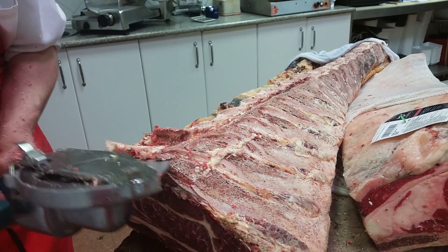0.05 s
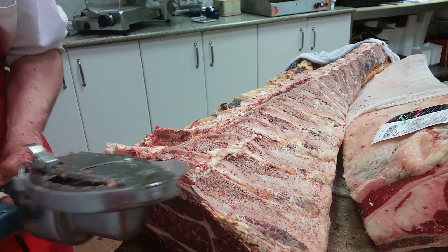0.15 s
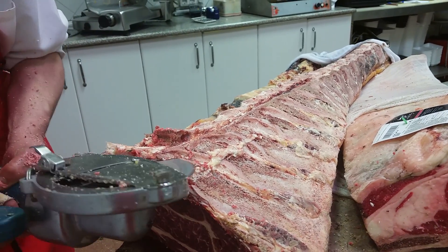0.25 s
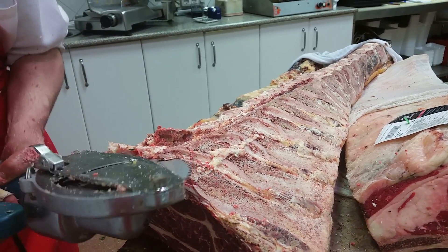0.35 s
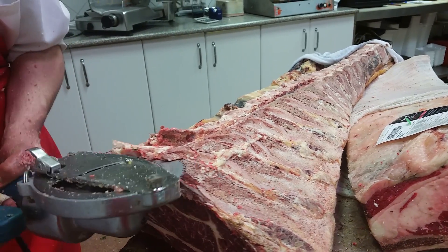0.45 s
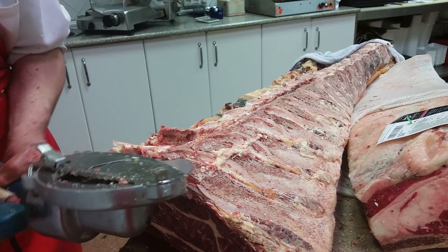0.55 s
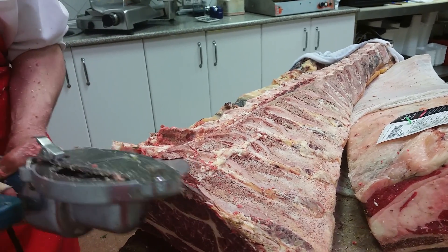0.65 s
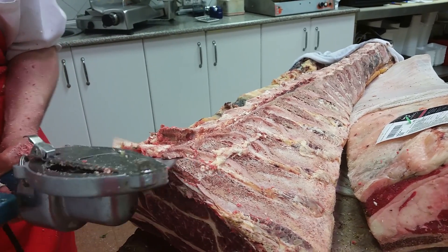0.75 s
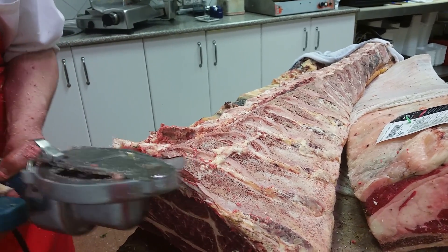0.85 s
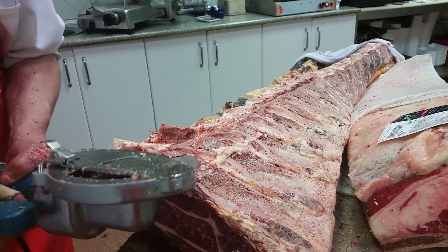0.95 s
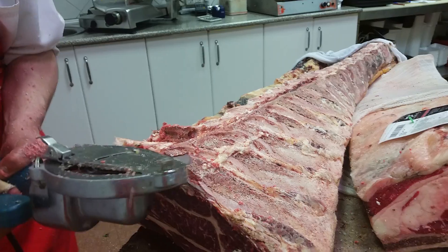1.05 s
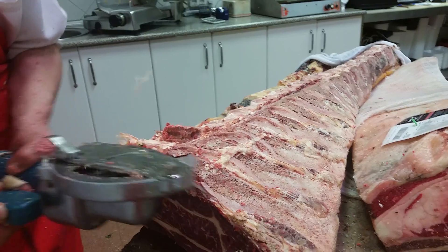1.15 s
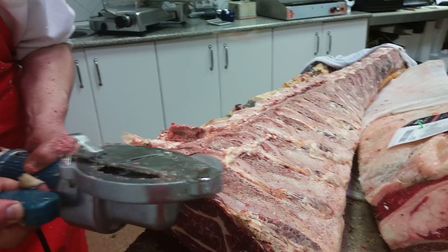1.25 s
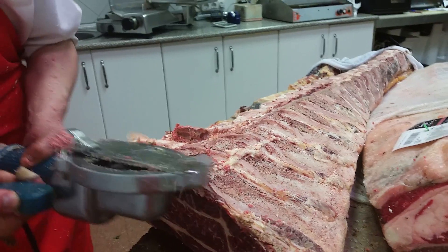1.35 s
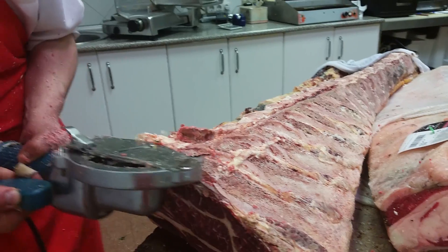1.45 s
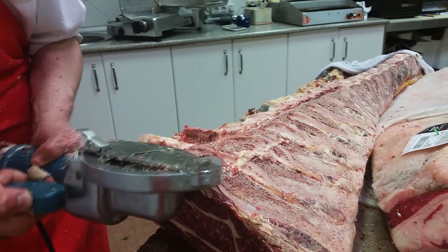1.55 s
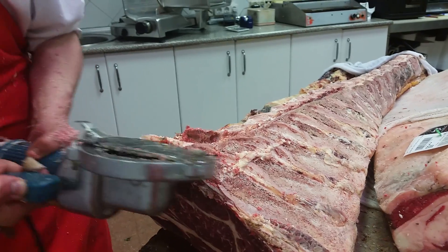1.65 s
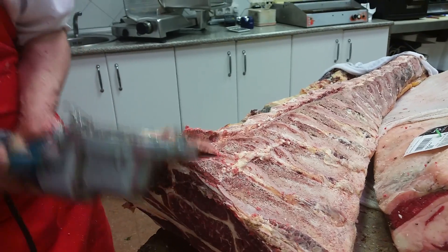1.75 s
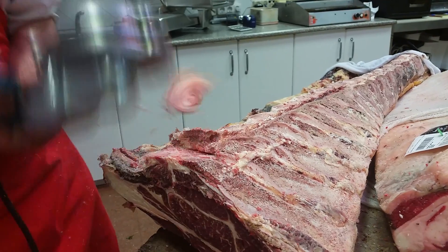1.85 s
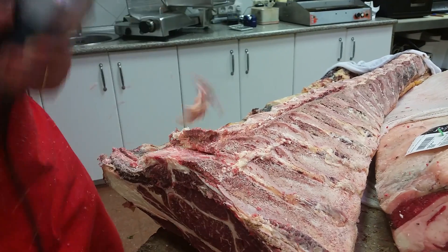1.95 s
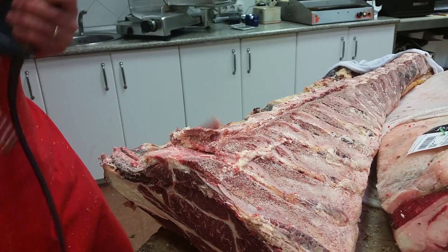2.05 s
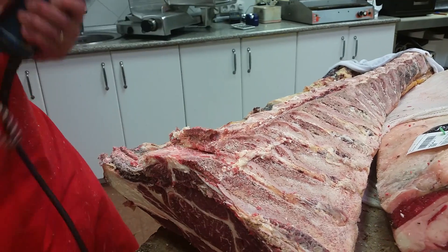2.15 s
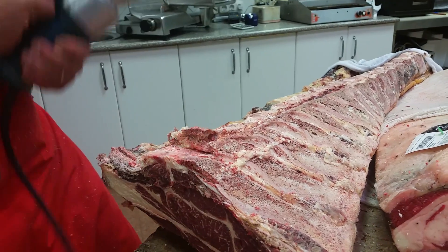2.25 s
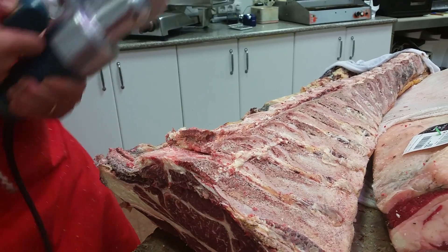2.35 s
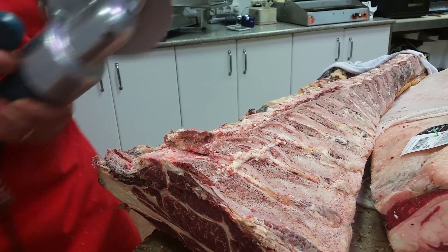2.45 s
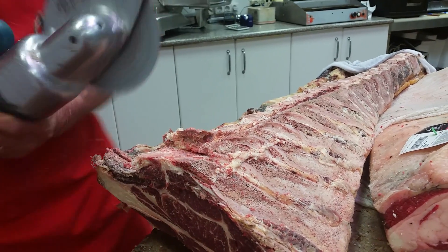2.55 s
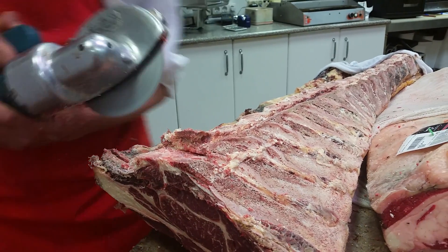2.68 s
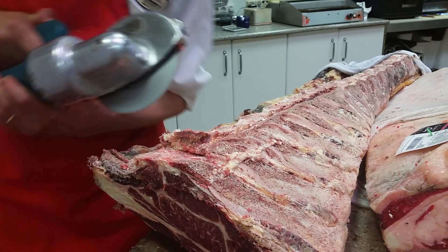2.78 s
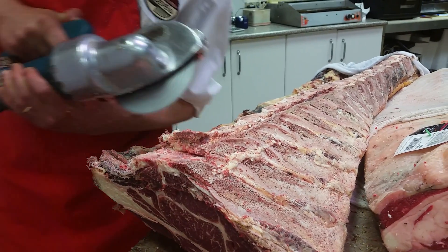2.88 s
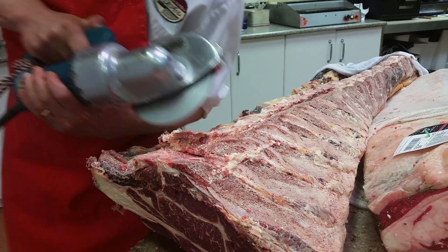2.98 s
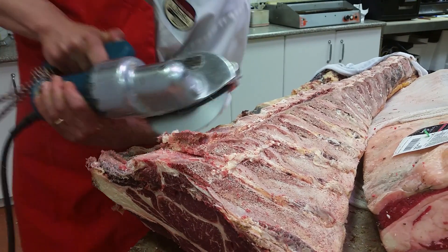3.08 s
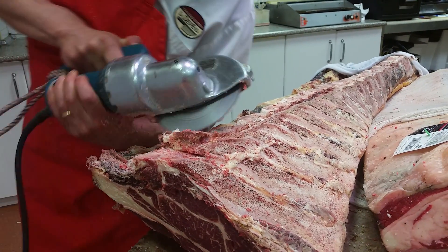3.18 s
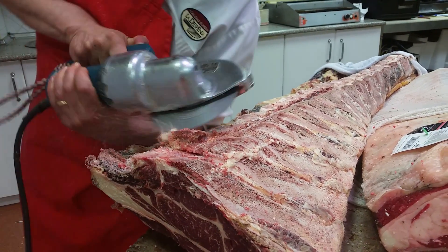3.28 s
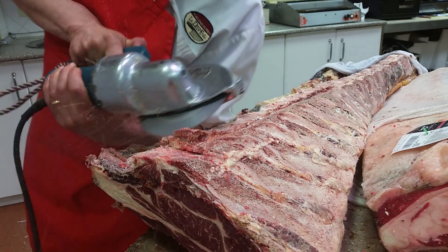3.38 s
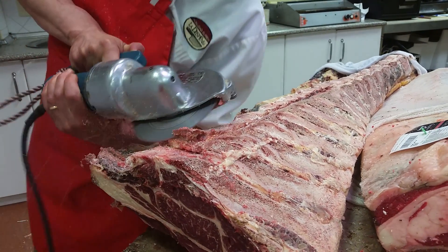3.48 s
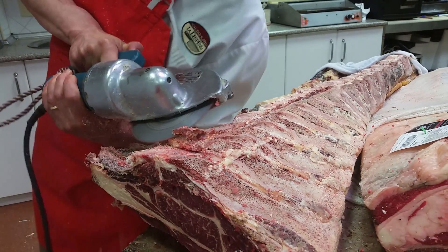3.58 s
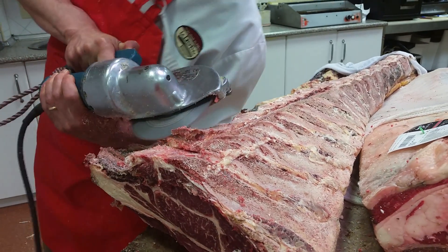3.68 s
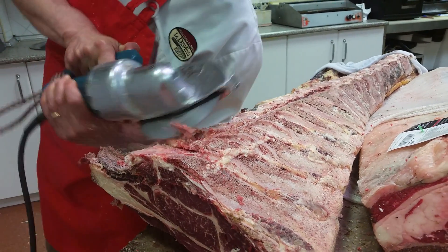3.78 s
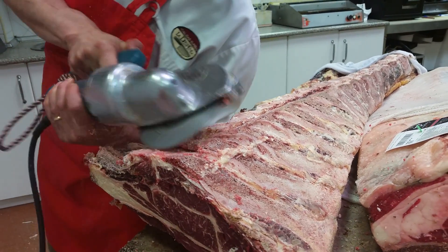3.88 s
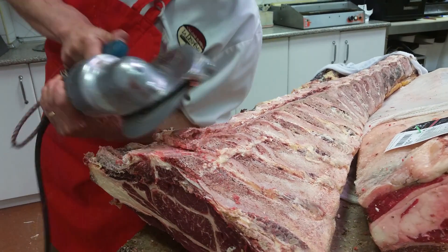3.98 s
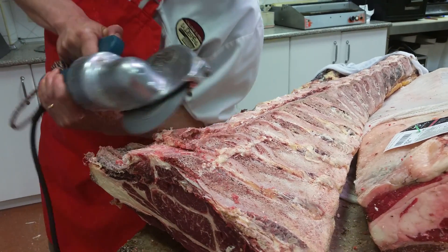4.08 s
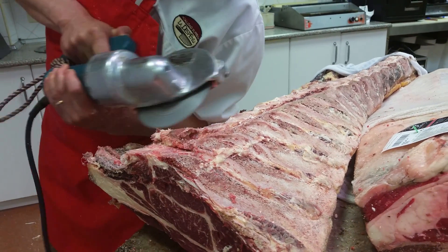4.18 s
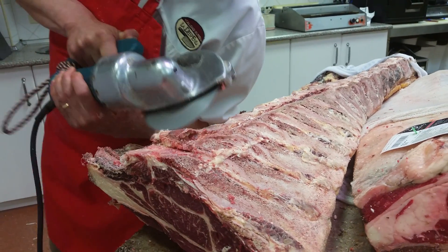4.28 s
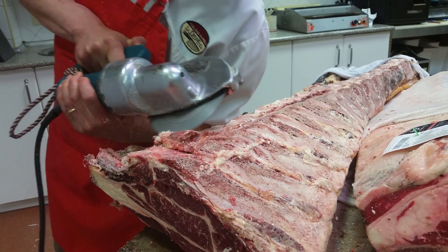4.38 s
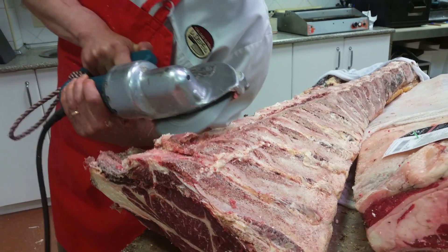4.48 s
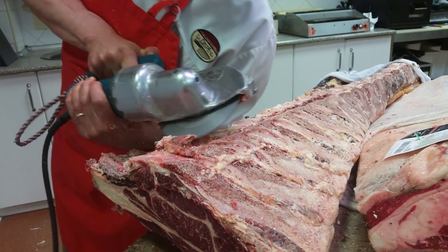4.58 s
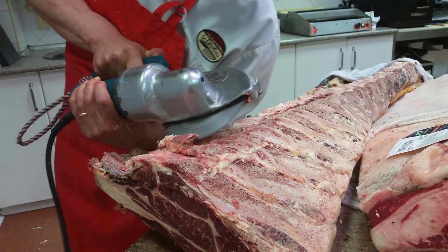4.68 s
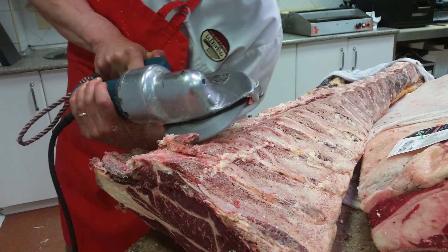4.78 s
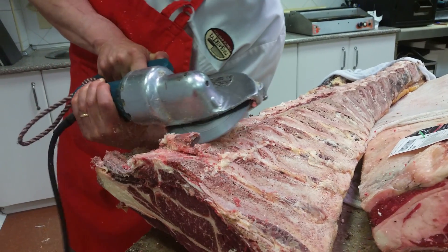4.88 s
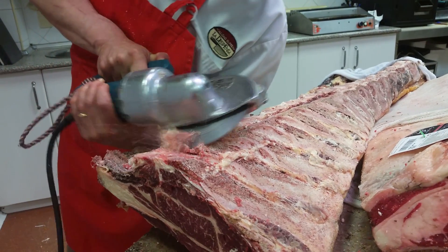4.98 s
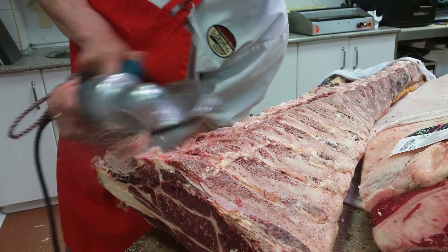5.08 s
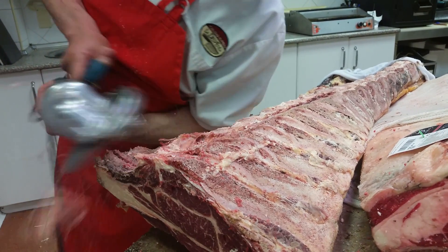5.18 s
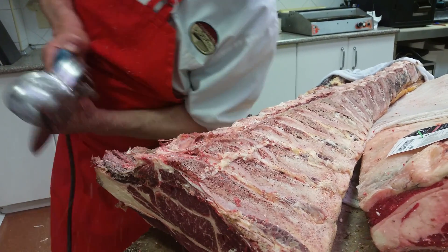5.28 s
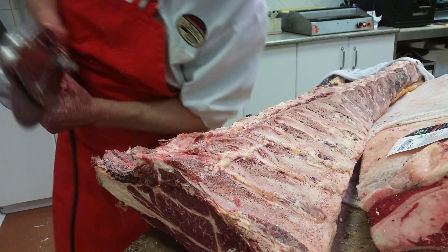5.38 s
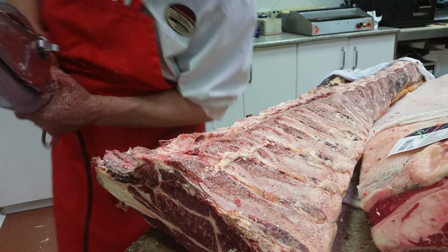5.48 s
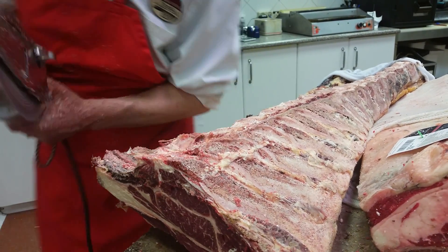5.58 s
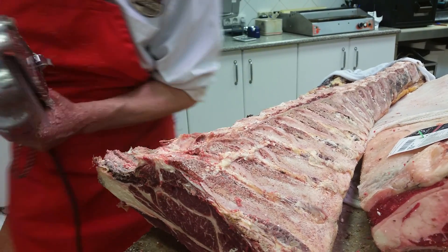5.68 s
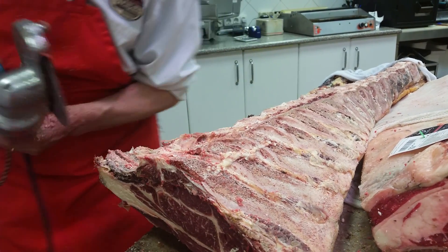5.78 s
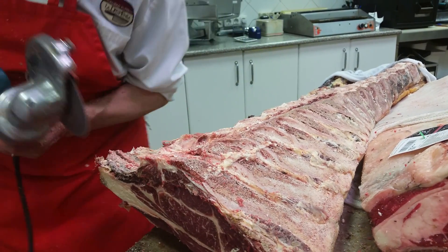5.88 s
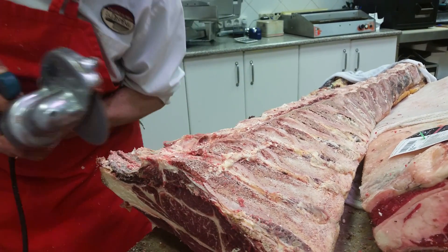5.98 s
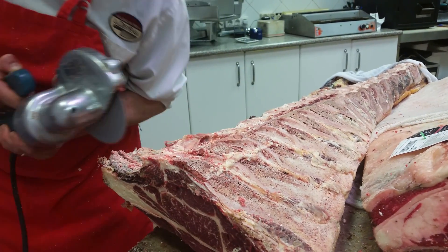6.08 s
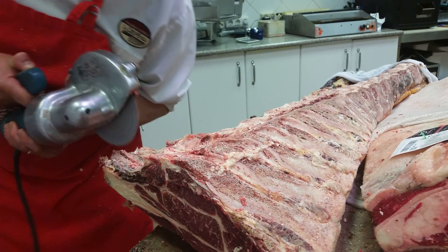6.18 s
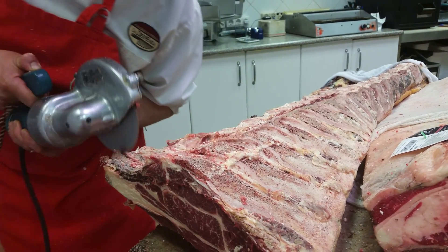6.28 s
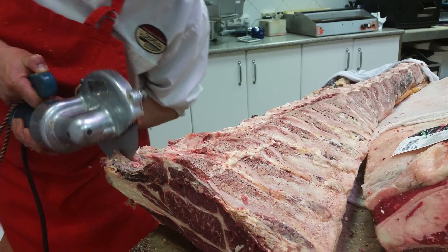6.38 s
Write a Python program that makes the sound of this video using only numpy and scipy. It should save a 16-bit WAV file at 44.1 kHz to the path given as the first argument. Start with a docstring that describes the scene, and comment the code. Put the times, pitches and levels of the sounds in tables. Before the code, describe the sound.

A handheld circular saw rasps into beef bone, jams for a moment, then breaks free into a longer cut with a ringing blade and dull knocks of flying chips. The motor coasts down with rattling gears, whines back up and makes several more cuts before dipping and climbing again. The saw is close and somewhat to the right, in a small tiled room with a faint refrigeration hum.

```python
"""Circular saw on beef rib

A handheld saw cuts bone in a small tiled room, over low rumble and refrigeration hum.
The teeth rasp, tear out chips and set the steel disc ringing; the blade jams once and breaks free.
The trigger is released and pulled again: gears rattle, the motor whine sinks and climbs."""
import sys
import numpy as np
from scipy import signal
from scipy.io import wavfile
from scipy.ndimage import uniform_filter1d

SR = 44100
rng = np.random.default_rng(int(sys.argv[2]) if len(sys.argv) > 2 else 0)


def store_wav(level_fs):
    """Save 16-bit WAV to argv[1]."""
    pcm = np.round(np.clip(np.atleast_2d(level_fs), -1, 1) * 32767)
    wavfile.write(sys.argv[1], SR, pcm.T.astype(np.int16))


N = 283563
TIME_S = np.arange(N) / SR

# Table levels are relative within each layer.
# room rumble: freq_hz, density_db
RUMBLE_SPECTRUM = [(20, -10), (45, 6), (80, -25), (200, 1), (500, -2), (2000, -5), (10000, -18)]
# refrigeration hum: pitch_hz, level_db
HUM_TONES = [(101, -57.5), (325, -62.5)]
# trigger held: pulled_s, released_s
TRIGGER_SPANS = [(0, .28), (.62, 1.764), (2.485, 5.11), (5.56, 6.28)]
# how the saw is held: time_s, left_minus_right_db, nearness_db, vent_facing_db
SAW_POSES = [(0.0, -3.5, 2, 2), (0.59, -8.5, 2.5, 0), (0.64, -11, 2, 2.5), (1.84, -6, 0.5, 2),
             (2.22, -8.5, 0, 0.5), (3.49, -7, 0, -3), (4.32, -7.0, 0, 0.5), (4.51, -10, -0.5, -11),
             (5.17, -9.5, 1, 1), (5.23, -7.5, 0.5, 2), (5.77, -10, 0, -2), (6.43, -1, 1, 1.5)]
# fan, bearing and commutator tones: rotor_multiple, level_db
ROTOR_ORDERS = [(1, -31), (1.5, -33.5), (2, -28.5), (2.585, -39), (3, -30.5), (3.63, -29), (9.56, -40),
                (16, -9.5), (32, -19.5)]
# gearbox rattle: freq_hz, density_db
GEAR_SPECTRUM = [(100, -22), (400, -19), (950, -12), (1400, -6), (2000, -4.5), (2700, -3.5), (3550, -13.5),
                 (4500, 3), (6200, -1), (7300, -1.5), (8900, -1), (9800, -22.5), (15500, -25)]
# gear case resonances: freq_hz, width_hz, gain_db
CASE_MODES = [(1930, 160, 3.5), (2454, 220, 10), (6150, 306, 10.5), (9000, 1140, 3)]
# cooling air: freq_hz, density_db
FAN_SPECTRUM = [(200, -19), (900, -25), (1800, -10.5), (2600, 4), (3600, -3), (4600, 0), (6400, 4.5),
                (9000, 5.5), (10000, 1.5), (15500, -7)]
# housing under strain: start_s, end_s, level_db
HOUSING_GROANS = [(0.31, 0.38, -39), (0.607, 0.714, -36.5)]
# blade in bone: start_s, end_s, bite_db, fade_db_per_s, wobble_db, rotor_drag_per_s
BONE_CUTS = [(-.01, 0.197, -21.3, 52, 0, 0.53), (.638, 1.74, -21.5, 75, 2, 0.51),
             (1.835, 1.909, -22, 230, -1, 0.52), (3.35, 3.598, -22.5, 53, 3, .38),
             (3.844, 3.909, -19.5, 600, 1, 0.98), (4.413, 5.101, -19.5, 304, 1, .45)]
# brief touches on bone: start_s, level_db, length_s
BONE_GRAZES = [(0.638, -25, 0.013), (3.172, -21, 0.023), (3.207, -24, 0.019), (3.236, -19, 0.034),
               (3.308, -16.5, 0.03), (3.983, -14.5, 0.01), (5.17, -17, 0.035), (6.352, -19, 0.028)]
# teeth digging deep: start_s, end_s, level_db
DEEP_DIGS = [(0, 0.23, -27.5), (0.719, 1.24, -29.5), (1.319, 1.449, -37), (1.44, 1.749, -29),
             (1.854, 1.912, -34), (3.427, 3.519, -29.5), (3.842, 3.884, -30), (4.424, 4.6, -28),
             (4.747, 4.935, -28), (4.995, 5.097, -29.5)]
# largest chips: time_s, level_db
LARGE_CHIPS = [(0.733, -13), (0.868, -3), (0.911, -4), (0.987, -9), (1.028, -7), (1.115, -3.5), (1.152, 2),
               (1.634, 0.5), (4.57, 1), (5.066, 2)]
# dull knock of a chip: freq_hz, density_db
CHIP_SPECTRUM = [(25, -15), (60, -4.5), (110, -1.5), (200, -2), (400, -5), (800, -9.5), (1600, -9),
                 (5000, -38)]
# teeth in bone: freq_hz, density_db
RASP_SPECTRUM = [(100, -33), (400, -4.5), (900, 0), (2000, -2.5), (4000, 5.5), (7000, -38), (10000, -8),
                 (15500, 6.5)]
# disc and guard modes: freq_hz, width_hz, flat_db, upright_db
BLADE_MODES = [(1850, 570, -8, -30), (2320, 130, -4.5, -10.5), (2408, 400, -15, -8),
               (2950, 210, -9.5, -8.5), (3720, 130, -14, -14.5), (4596, 73, -20, -10),
               (4826, 65, -5, -12.5), (5900, 42, -5.5, -6.5), (6220, 95, -1.5, -3), (6800, 320, -6, -5),
               (7445, 150, -4.5, -4.5), (7800, 170, -0.5, -5.5), (8250, 420, -2, -9.5), (8380, 130, -9, -9),
               (9440, 460, -3, -1), (10954, 100, -16, -3), (11290, 200, -0.5, -0.5),
               (13000, 240, -39, -1.5), (13500, 310, -6.5, -5.5)]
# disc brushing the cut, one row: start_s, end_s, level_db, fade_db_per_s
SING_SPAN = (3.48, 3.82, -20.5, 200)
# modes of the brushed disc: freq_hz, width_hz, level_db
SING_MODES = [(10890, 110, 0), (12910, 150, -3.5)]

INITIAL_HZ, FREE_HZ, GEAR_RATIO = 371, 473.2, 18.4  # rotor speeds; rotor turns per disc turn
JAM_S, FREED_S = .365, .603
UPRIGHT_S = 2.5  # saw held flat until then
BITE_ATTACK_S = .008


def gain_of(db):
    """Decibels to amplitude."""
    return np.exp(np.asarray(db) * (np.log(10) / 20))


def unit_rms(x):
    """Scale to rms 1."""
    return x / np.sqrt(np.mean(x ** 2) + 1e-20)


def during(start_s, end_s):
    """Rectangular gate."""
    return 1.0 * ((TIME_S >= start_s) & (TIME_S < end_s))


def stroke(start_s, end_s, attack_s, fade_db_per_s):
    """Linear attack, hold, steady fade in dB after end_s."""
    fade_db = np.minimum(fade_db_per_s * np.maximum(TIME_S - end_s, 0), 200)
    return np.clip((TIME_S - start_s) / attack_s, 0, 1) * gain_of(-fade_db)


def wander(rate_hz):
    """Random drift, unit rms."""
    knots = rng.standard_normal(2 ** 14)
    return unit_rms(np.interp(TIME_S * (2.5 * rate_hz), np.arange(len(knots)), knots))


def linger(x, decay_s):
    """One-pole lag with an exponential tail."""
    pole = np.exp(-1 / (decay_s * SR))
    return signal.lfilter([1 - pole], [1, -pole], x)


def diffuse(shared=.23, lag_samples=6):
    """Stereo noise: a direct share reaches the left first, the rest comes from every wall."""
    noise = rng.standard_normal((3, N), dtype=np.float32)
    direct = np.array([noise[2], np.roll(noise[2], lag_samples)])
    return np.sqrt(1 - shared) * noise[:2] + np.sqrt(shared) * direct


def strikes(per_s, spread_db, decay_s, shared=.3):
    """Random impacts of unequal size, each a short spray of reflections; unit rms."""
    sizes = gain_of(spread_db * np.minimum(rng.exponential(1, N), 4))
    hits = sizes * (rng.random(N) < per_s / SR)
    return unit_rms(np.sqrt(linger(hits ** 2, decay_s)) * diffuse(shared))


def colour(x, spectrum, peaks=(), size=4096):
    """Unit-energy minimum-phase filter from a spectrum and resonant peaks."""
    hz = abs(np.fft.fftfreq(size, 1 / SR))
    knots_hz, knots_db = np.transpose(spectrum)
    db = np.interp(np.log(hz + 1), np.log(knots_hz + 1), knots_db)
    for peak_hz, width_hz, gain_db in peaks:
        db += gain_db / (1 + (2 * (hz - peak_hz) / width_hz) ** 2)
    log_response = np.conj(signal.hilbert(np.log(gain_of(db))))
    impulse = np.fft.ifft(np.exp(log_response)).real[:size // 2]
    return signal.oaconvolve(x, impulse[None] / np.linalg.norm(impulse), axes=1)[:, :N]


def ring(x, hz, width_hz):
    """One mode; white noise keeps its level through it."""
    radius = np.exp(-np.pi * width_hz / SR)
    feedback = [1, -2 * radius * np.cos(2 * np.pi * hz / SR), radius ** 2]
    return signal.lfilter([1, 0, -1], feedback, x) * np.sqrt((1 - radius ** 2) / 2)


def panned(x, balance_db):
    """Raise left over right by balance_db."""
    return x * gain_of(np.array([[.5], [-.5]]) * balance_db)


def shaded(x, balance_db, shadow_hz=1000, lag_samples=10):
    """Source at one side: treble shaded at the far ear, bass equally loud at both."""
    bass = signal.sosfiltfilt(signal.butter(2, shadow_hz, fs=SR, output="sos"), x)
    return np.array([bass[0], np.roll(bass[0], lag_samples)]) + panned(x - bass, balance_db)


def room_tone(rumble_db=-53):
    """Refrigeration hum and low room rumble."""
    hum = sum(gain_of(db) * np.sqrt(2) * np.sin(2 * np.pi * (hz * TIME_S + rng.random()))
              for hz, db in HUM_TONES)
    return hum + gain_of(rumble_db) * colour(diffuse(shared=.85), RUMBLE_SPECTRUM)


def reflections(x, wall_db=-3, drift_hz=1.5, reach_s=.03, count=8):
    """Echoes off counter, cupboards and tiles drift as the saw moves, combing its sound."""
    out = x.copy()
    for ear in range(2):
        for delay_s in reach_s * rng.uniform(.1, 1, count):
            lag = 1 + int(delay_s * SR)
            echo = gain_of(wall_db) / np.sqrt(count) * wander(drift_hz) * x[ear]
            out[ear, lag:] += echo[:-lag]
    return out / np.sqrt(1 + gain_of(wall_db) ** 2)


def rotor_speed_hz(trigger, run_up_tau_s=.335, coast_tau_s=1.45, jam_drag_per_s=5):
    """Current pulls the rotor towards free speed; friction, bone and the jam brake it."""
    pull_per_s = trigger / run_up_tau_s
    friction_per_s = (1 - trigger) / coast_tau_s
    load_per_s = sum(drag * during(start_s, end_s) for start_s, end_s, *_, drag in BONE_CUTS)
    load_per_s += jam_drag_per_s * during(JAM_S, FREED_S)
    # solves speed' = pull * FREE_HZ - (pull + friction + load) * speed
    slowing = np.exp(np.cumsum(pull_per_s + friction_per_s + load_per_s) / SR)
    return (INITIAL_HZ + np.cumsum(FREE_HZ * pull_per_s * slowing) / SR) / slowing


def jam_gain(fade_db_per_s=88, breakaway_s=.024):
    """All that turns fades while the blade binds and snaps back as it breaks free."""
    stuck = np.clip(1 - (TIME_S - FREED_S) / breakaway_s, 0, 1)
    return gain_of(-fade_db_per_s * np.maximum(TIME_S - JAM_S, 0) * stuck)


def housing_groan(pitch_hz=615, width_hz=45):
    """The housing groans as the blade binds and again as the motor pulls it free."""
    strain = sum(gain_of(db) * stroke(start_s, end_s, attack_s=.025, fade_db_per_s=250)
                 for start_s, end_s, db in HOUSING_GROANS)
    return ring(strain * diffuse(), pitch_hz, width_hz)


def gear_clatter(flutter_db=1.5):
    """Gear teeth rattle in their resonant case."""
    impacts = strikes(per_s=1500, spread_db=2, decay_s=.002) * gain_of(flutter_db * wander(50))
    return colour(impacts, GEAR_SPECTRUM, CASE_MODES)


def gear_mesh(rotor_hz, multiple=15.8, spread_hz=330, onset_hz=295, full_hz_per_s=300):
    """Gear teeth rasp in a rising band while the rotor accelerates."""
    climb_hz_per_s = np.gradient(uniform_filter1d(rotor_hz, SR // 10)) * SR
    torque = np.clip(climb_hz_per_s / full_hz_per_s, 0, 1)
    fade_in = np.clip((rotor_hz - onset_hz) / 20, 0, 1)
    carrier = np.sin(2 * np.pi * np.cumsum(multiple * rotor_hz) / SR)
    return np.sqrt(2 * torque) * fade_in * carrier * np.array([wander(spread_hz), wander(spread_hz)])


def whine(rotor_hz, brush_gain, waver=.001, flicker_db=3, ear_lag_cycles=.1):
    """Rotor-locked tones; the high ones come from the commutator and follow the brushes."""
    turns = np.cumsum(rotor_hz * (1 + waver * wander(60))) / SR
    out = np.zeros((2, N))
    for multiple, db in ROTOR_ORDERS:
        drive = brush_gain if multiple > 5 else 1
        cycles = multiple * turns + rng.random()
        for ear in range(2):
            level = drive * gain_of(db + flicker_db * wander(12.5))
            out[ear] += level * np.sin(2 * np.pi * (cycles - ear * ear_lag_cycles))
    return np.sqrt(2) * out


def fan(vent_db):
    """Cooling air rushes, louder when the vents face the listener."""
    return gain_of(vent_db) * colour(diffuse(), FAN_SPECTRUM)


def motor(rotor_hz, trigger, bite, level_db=-18.5, gears_db=-2, mesh_db=-9, fan_db=-3,
          coast_db=.3, coast_drive_db=-3, flat_drive_db=4, smother_db=-28, reference_hz=450):
    """Gears, fan and whine follow rotor speed; load smothers the mesh and commutator tones."""
    _, nearness_db, vent_db = pose_db()
    pace = np.clip(rotor_hz / reference_hz, .3, 2)
    coasting = linger(1 - trigger, decay_s=.027)
    unloaded = 1 / (1 + (bite / gain_of(smother_db)) ** 2)
    powered_flat = (1 - coasting) * (TIME_S < UPRIGHT_S)
    drive = gain_of(coast_drive_db * coasting + flat_drive_db * powered_flat)
    clatter = gain_of(gears_db) * pace ** (1.15 * coasting) * gear_clatter()
    mesh = gain_of(mesh_db) * unloaded * gear_mesh(rotor_hz)
    air = gain_of(fan_db) * drive * pace ** 2.53 * fan(vent_db)
    tones = pace ** 2.6 * whine(rotor_hz, drive ** 2 * unloaded)
    return gain_of(level_db + coast_db * coasting + nearness_db) * (clatter + mesh + air + tones)


def pose_db():
    """The saw moves in the hand: balance, nearness and vent-facing curves."""
    times_s, *columns = np.transpose(SAW_POSES)
    return [np.interp(TIME_S, times_s, column) for column in columns]


def grazes():
    """Envelope of brief touches of blade on bone, each a steep-sided arch."""
    envelope = np.zeros(N)
    for start_s, db, length_s in BONE_GRAZES:
        progress = np.clip((TIME_S - start_s) / length_s, 0, 1)
        envelope += gain_of(db) * np.sqrt(abs(np.sin(np.pi * progress)))
    return envelope


def tooth_bite(rotor_hz, wobble, uneven_db=.5):
    """Contact strength: cuts that grow with speed and swing with disc wobble, plus grazes."""
    cutting = sum(stroke(start_s, end_s, BITE_ATTACK_S, fade_db_per_s) * gain_of(db + wobble_db * wobble)
                  for start_s, end_s, db, fade_db_per_s, wobble_db, _ in BONE_CUTS)
    return cutting * (rotor_hz / FREE_HZ) ** .22 * gain_of(uneven_db * wander(40)) + grazes()


def bone_chips(bite, wobble, small_db=2.5, large_db=7.5, graze_db=-16, crumbs_db=-24, wobble_db=4.2):
    """Chips tear loose with dull knocks: small ones spurting with each disc turn, a few large."""
    digging = sum(gain_of(db) * stroke(start_s, end_s, attack_s=.006, fade_db_per_s=360)
                  for start_s, end_s, db in DEEP_DIGS)
    spurts = gain_of(small_db + wobble_db * wobble) * digging
    tearing = spurts + gain_of(graze_db) * grazes() + gain_of(crumbs_db) * bite
    energy = np.zeros(N)
    for time_s, db in LARGE_CHIPS:
        energy[round(time_s * SR)] += gain_of(db + large_db) ** 2
    large = np.sqrt(linger(energy, decay_s=.0015)) * diffuse(shared=.096)
    small = tearing * strikes(per_s=380, spread_db=3, decay_s=.0024, shared=.069)
    return colour(small + large, CHIP_SPECTRUM)


def disc_sing(drift_db=3):
    """The disc sings high when it only brushes the cut."""
    start_s, end_s, level_db, fade_db_per_s = SING_SPAN
    brushing = stroke(start_s, end_s, BITE_ATTACK_S, fade_db_per_s)
    brushing *= gain_of(level_db + drift_db * wander(25))
    return sum(ring(brushing * gain_of(db) * diffuse(), hz, width_hz) for hz, width_hz, db in SING_MODES)


def blade(bite, rasp_db=2, drift_db=3, tail_share=.11, tail_s=.028, damping_hz=11000):
    """Tooth strikes rasp and ring the disc; its modes swell and fade as it moves in the slot."""
    teeth = bite * strikes(per_s=2100, spread_db=6, decay_s=.00075)
    sound = gain_of(rasp_db) * colour(teeth, RASP_SPECTRUM)
    # the steel rings on after the teeth let go
    ringing = np.sqrt((1 - tail_share) * bite ** 2 + tail_share * linger(bite ** 2, tail_s))
    for hz, width_hz, flat_db, upright_db in BLADE_MODES:
        mode_db = np.where(TIME_S > UPRIGHT_S, upright_db, flat_db) + drift_db * wander(16)
        damping = .58 + (hz / damping_hz) ** 2  # flesh damps high modes most
        sound += ring(ringing * gain_of(mode_db) * diffuse(), hz, width_hz * damping)
    return sound


def scene():
    """Motor, disc and bone over the quiet room."""
    trigger = sum(during(pulled_s, released_s) for pulled_s, released_s in TRIGGER_SPANS)
    rotor_hz, turning = rotor_speed_hz(trigger), jam_gain()
    disc_turns = np.cumsum(rotor_hz / GEAR_RATIO) / SR
    wobble = np.sin(2 * np.pi * (disc_turns + rng.random()))
    bite = tooth_bite(rotor_hz, wobble) * turning
    body = motor(rotor_hz, trigger, bite) * turning + housing_groan()
    disc = blade(bite) + disc_sing()
    body_balance_db, _, _ = pose_db()
    saw = reflections(shaded(body, body_balance_db) + panned(disc, balance_db=-3.5))
    return saw + panned(bone_chips(bite, wobble), balance_db=-3) + room_tone()


def record(dry, ceiling=.98, cutoff_hz=15850):
    """Soft clip, then low-pass."""
    rounded = ceiling * np.tanh(dry / ceiling)
    lowpass = signal.firwin(511, cutoff_hz, window=("kaiser", 9), fs=SR)
    return signal.oaconvolve(rounded, lowpass[None], "same")


dry = scene()
out = record(dry)
store_wav(out)
```